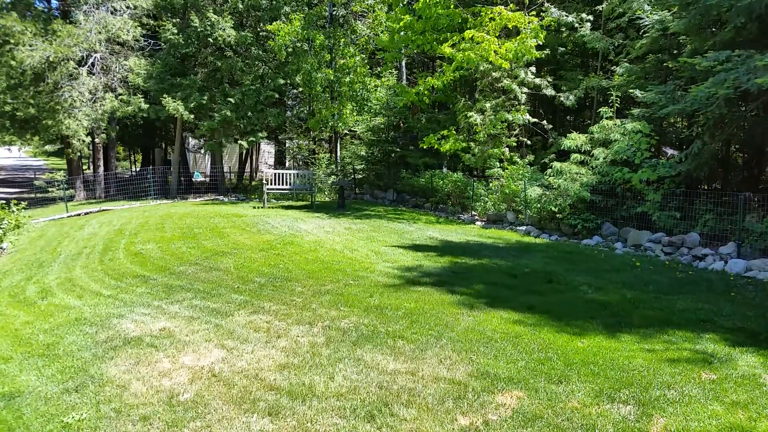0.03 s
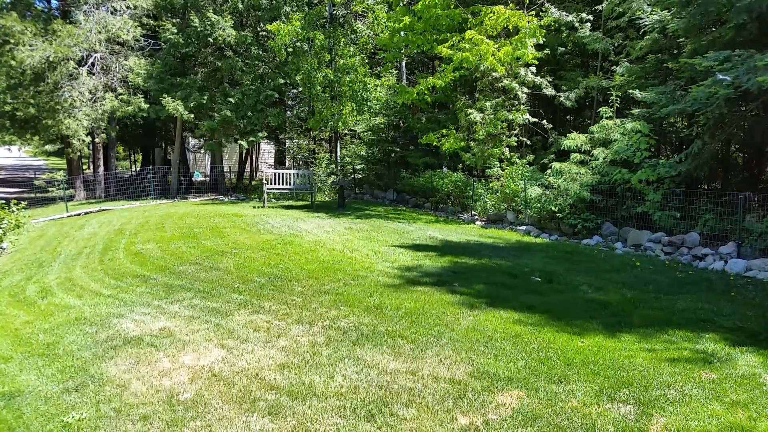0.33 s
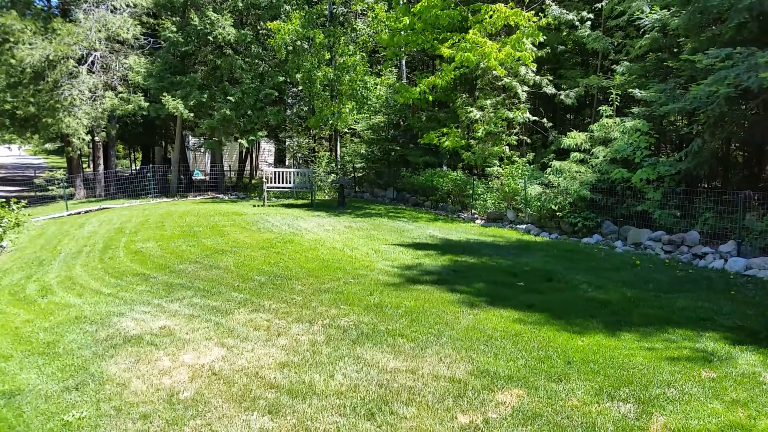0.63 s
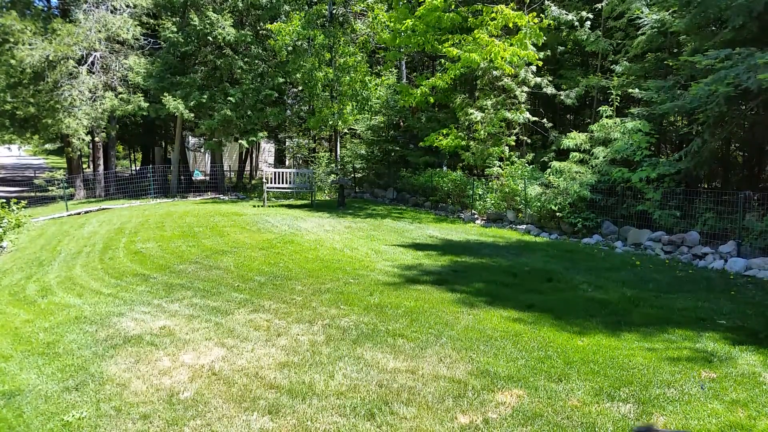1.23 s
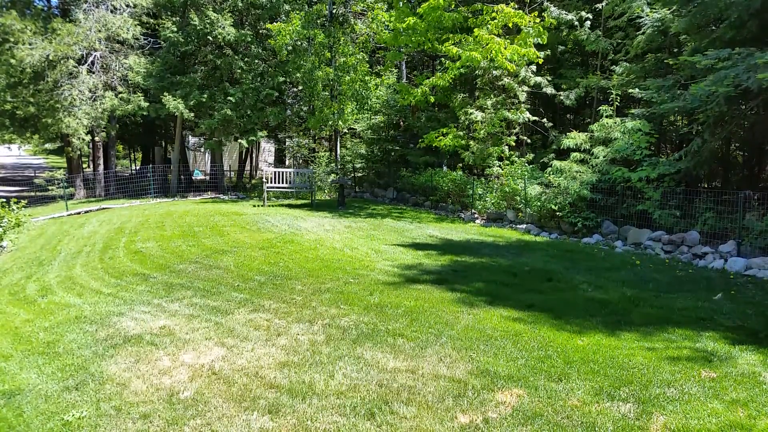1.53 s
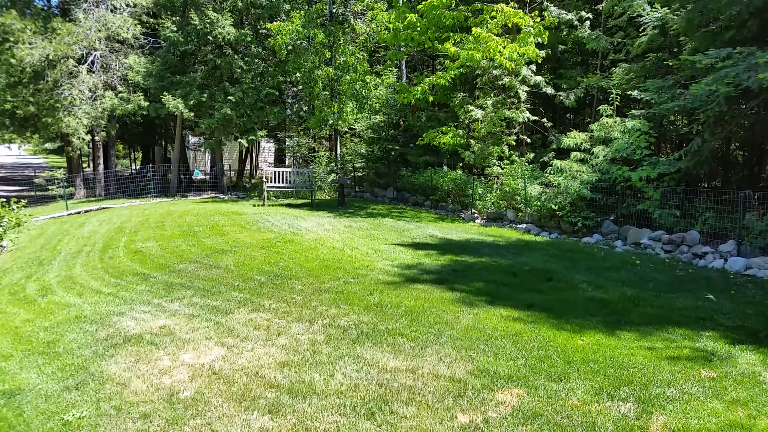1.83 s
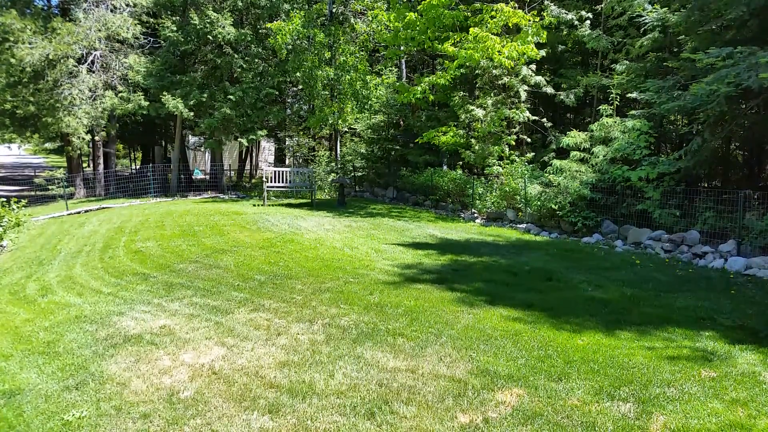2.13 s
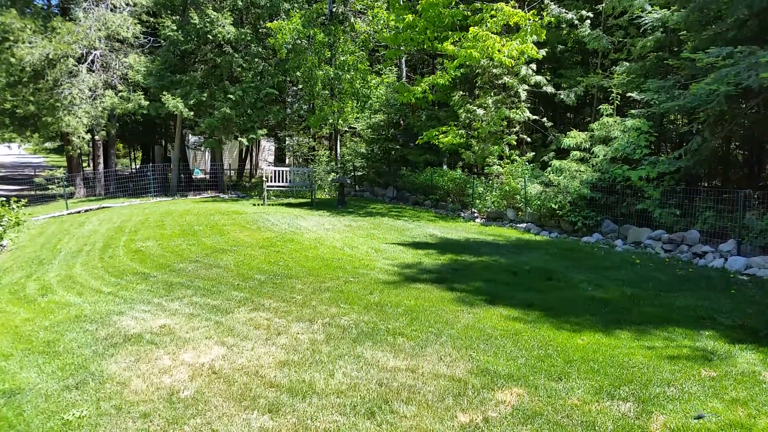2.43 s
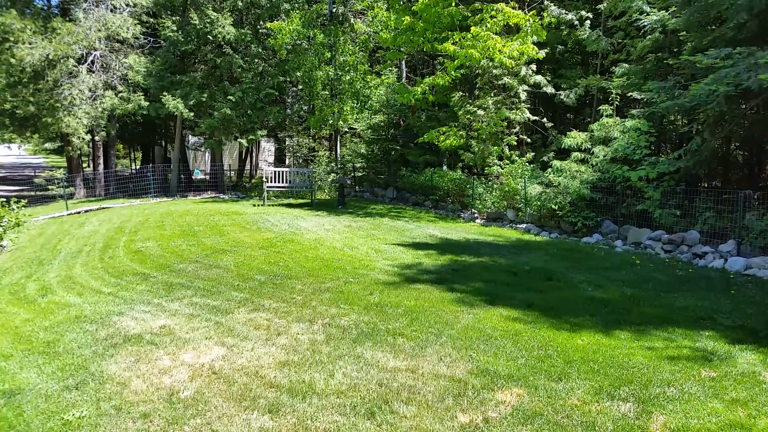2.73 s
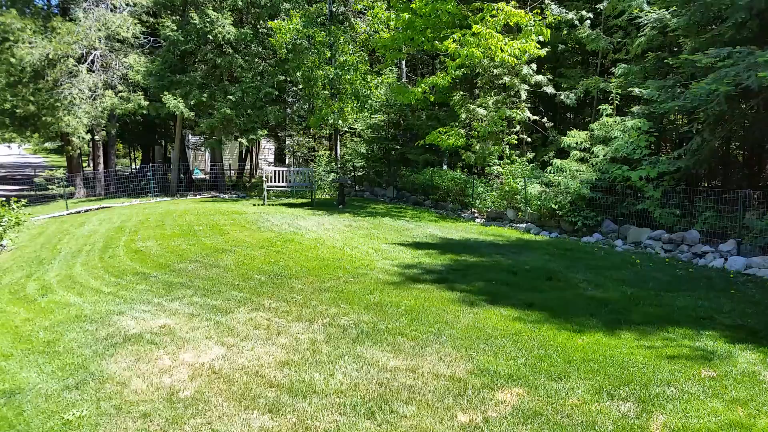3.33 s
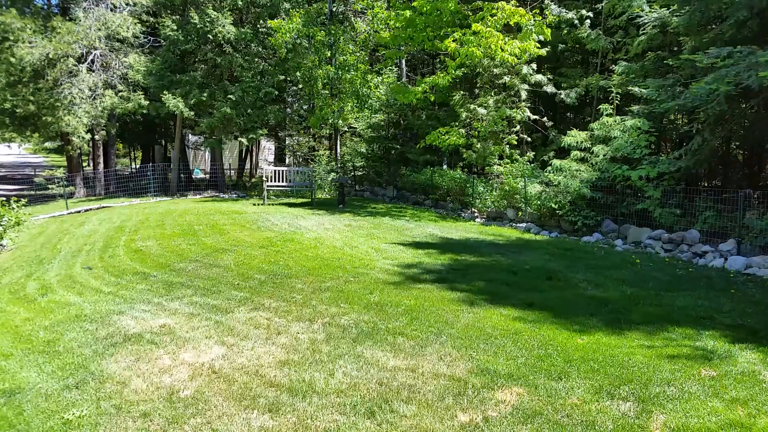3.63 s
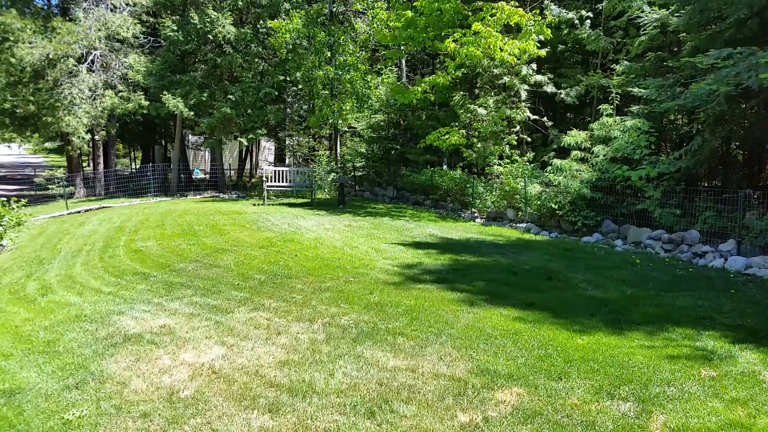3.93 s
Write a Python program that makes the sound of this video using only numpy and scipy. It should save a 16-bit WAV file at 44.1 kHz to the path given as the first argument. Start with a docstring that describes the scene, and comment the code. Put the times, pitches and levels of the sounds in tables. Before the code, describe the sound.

A light breeze puffs against the microphone with soft thumps, over gently rustling leaves.

```python
"""A light breeze buffets the right microphone port in puffs; its strongest eddies land as soft thumps.
Behind it lies a lawn edged by trees: leaves rustle and hiss over a far rumble, mostly from the left,
and slowly grow with the breeze. A few nearby leaves stir, a distant whine swells once,
and there is one tiny tick."""
import sys
import numpy as np
from scipy import signal
from scipy.fft import rfft, irfft, next_fast_len
from scipy.io import wavfile
from scipy.ndimage import uniform_filter1d, map_coordinates

SR = 44100
rng = np.random.default_rng(int(sys.argv[2]) if len(sys.argv) > 2 else 0)


def dump(signal):
    """Clip the signal to [-1, 1] and save it as 16-bit WAV at the path in sys.argv[1]."""
    limited = np.clip(np.atleast_2d(signal).T, -1, 1)
    pcm = np.round(limited * 32767).astype(np.int16)
    wavfile.write(sys.argv[1], SR, pcm)


N = 176400

# Fader ride of the breeze: (time [s], relative level [dB])
BREEZE_RIDE = [(0, -4), (.6, -5.5), (.85, -2), (1.15, -3), (1.6, -0.5), (2.3, -0.96), (2.8, -1),
               (3.15, 1.33), (3.6, 0.84), (4, 2)]
# Tone colour of each noise layer: (frequency [Hz], relative density [dB])
RUMBLE_EQ = [(10, -19), (25, -1.5), (50, -6.5), (75, 0), (100, -5), (150, -12.5), (300, -22.5),
             (600, -41.5), (1500, -84.5)]
LEAVES_EQ = [(80, -32.5), (200, 2), (330, -1), (650, -1.5), (900, -5.5), (1150, -8.5), (1450, -2),
             (1750, -1), (2250, -6), (2700, -11.5), (3500, -19), (4200, -27), (5000, -37.5), (7000, -46.5),
             (9000, -47), (16000, -74.5)]
HISS_EQ = [(5000, -73.5), (7300, -33.5), (8300, -20.5), (9000, -6.5), (9560, 1.5), (10300, -4.5),
           (11300, -8), (12100, -6), (12700, -9.5), (13500, -17), (14500, -17), (15700, -16.5)]
BUFFET_EQ = [(8, -35.5), (22, -16), (50, 0), (90, 0), (150, -9.5), (250, -28.5), (400, -41), (700, -70.5),
             (2000, -100)]
FLUTTER_EQ = [(60, -27.5), (130, 1), (200, -2), (300, -17), (420, -22.5), (700, -38), (1500, -58.5),
              (4000, -92)]
FLURRY_EQ = [(6000, -60), (8500, -20), (9600, 0), (11500, -2), (12400, -4), (13500, -15), (15700, -18)]
RASP_EQ = [(600, -38), (1100, -9), (1500, -2), (1850, 0), (2300, -7), (3500, -29), (6000, -62)]
# Puffs on the right port: (peak time [s], half length [s], level [dB])
PORT_PUFFS = [(0.07, 0.008, -49), (0.143, 0.0051, -38.5), (0.635, 0.02, -39), (0.721, 0.034, -36.5),
              (0.819, 0.0041, -31.5), (0.887, 0.011, -35.5), (0.957, 0.051, -41.5), (1.071, 0.013, -41.5),
              (1.196, 0.0071, -37), (1.268, 0.037, -37), (1.412, 0.023, -31), (1.533, 0.013, -27.5),
              (1.628, 0.019, -35), (1.711, 0.022, -41), (1.794, 0.021, -31), (1.88, 0.045, -47),
              (1.981, 0.016, -35), (2.113, 0.014, -35), (2.25, 0.015, -31.5), (2.306, 0.012, -34),
              (2.362, 0.013, -31), (2.482, 0.0095, -30.5), (2.567, 0.024, -26), (2.716, 0.0071, -40),
              (2.854, 0.039, -30.5), (2.897, 0.0083, -21), (2.984, 0.11, -35), (3.062, 0.018, -27),
              (3.106, 0.011, -25), (3.149, 0.018, -26), (3.213, 0.023, -25), (3.311, 0.032, -26.5),
              (3.413, 0.021, -25.5), (3.484, 0.007, -27.5), (3.583, 0.0082, -28.5), (3.678, 0.0089, -34.5),
              (3.853, 0.036, -28), (3.916, 0.014, -25.5), (3.977, 0.025, -24)]
# Single eddies: (time [s], peak [dB], width [ms], port [0 left, 1 right], sign [+1 push, -1 suction])
EDDIES = [(0.701, -23, 5.7, 1, -1), (1.435, -22.5, 4.8, 0, -1), (1.56, -20.5, 5.3, 1, 1),
          (1.787, -21, 5.5, 1, 1), (2.557, -21, 4.5, 1, -1), (2.893, -10.5, 5.04, 1, 1),
          (2.904, -17.5, 4.2, 1, 1), (3.203, -20.5, 3.9, 1, -1), (3.228, -20, 4.1, 1, -1),
          (3.276, -17, 5.5, 1, 1), (3.309, -16, 5.3, 1, 1), (3.338, -17, 5.8, 1, 1),
          (3.417, -11.5, 3.94, 1, 1), (3.473, -20.5, 4.9, 1, 1), (3.58, -22.5, 3.75, 1, 1),
          (3.834, -14.5, 3.9, 1, 1), (3.853, -15.5, 3.2, 1, 1), (3.868, -12, 3.45, 1, 1),
          (3.968, -23, 3.5, 1, 1), (3.993, -13, 4.54, 1, 1)]
# Partials of the distant whine: (frequency [Hz], level [dB])
WHINE_PARTIALS = [(1043, -64), (1714, -69), (1785, -63.5), (1942, -68), (2070, -66)]
# Shading of the garden's right side: (frequency [Hz], gain [dB])
RIGHT_SIDE_EQ = [(60, 3), (125, -3.5), (300, -1.5), (650, -6.5), (1100, -5.5), (1750, -15.5), (2500, -10),
                 (3500, -5.5), (5000, 1.5), (7000, 1), (8300, -10.5), (9560, -22.5), (11000, -11.5),
                 (12100, -12.5), (13500, -5), (15700, 0)]


def amp(db):
    """Decibels to gain."""
    return 10 ** (np.asarray(db) / 20)


def seconds():
    """The time of every sample."""
    return np.arange(N) / SR


def swell(peak_s, half_s):
    """A bell-shaped rise and fall."""
    return np.exp(-.5 * ((seconds() - peak_s) / half_s) ** 2)


def wobble(rate):
    """A smooth random curve, rate knots a second."""
    return map_coordinates(rng.standard_normal(int(N * rate / SR) + 4), [seconds() * rate])


def unit(x):
    """Scaled to rms 1."""
    return x / np.sqrt(np.mean(x ** 2) + 1e-20)


def filtered(x, response):
    """x through a gain that depends on frequency."""
    size = next_fast_len(N + SR // 2)
    return irfft(rfft(x, size) * response(np.fft.rfftfreq(size, 1 / SR)), size)[..., :N]


def equalised(x, eq):
    """x through an EQ curve drawn on a log frequency axis."""
    knots_hz, db = np.transpose(eq)
    return filtered(x, lambda hz: amp(np.interp(np.log(hz + 1), np.log(knots_hz + 1), db)))


def rush(eq, patchy_db):
    """Wide stereo noise of rms 1, with patches of random gain across time and frequency."""
    bins = signal.stft(rng.standard_normal((2, N)), nperseg=512)[2]
    patches = uniform_filter1d(rng.standard_normal(bins.shape[1:]), size=7, axis=0)
    patches = unit(uniform_filter1d(patches, size=16, axis=1))
    noise = signal.istft(bins * amp(patchy_db * patches), nperseg=512)[1][:, :N]
    return unit(equalised(noise, eq))


def levelled(noise, samples):
    """A leveller: irons out chance swells longer than its window."""
    power = uniform_filter1d(uniform_filter1d(noise ** 2, samples), samples)
    return noise / np.sqrt(np.abs(power) + .04)


def far_rumble(breeze_db):
    """A smooth low bed that rides the breeze."""
    return amp(-47 + 0.86 * breeze_db) * levelled(rush(RUMBLE_EQ, patchy_db=4.5), samples=3000)


def leaf_rustle(breeze_db):
    """The breeze moves the leaves: a softly wavering midrange."""
    return amp(-53.5 + 0.91 * breeze_db + 0.19 * wobble(7.7)) * rush(LEAVES_EQ, patchy_db=0.95)


def leaf_hiss(breeze_db):
    """The airy top of the leaves, growing a little faster than the breeze."""
    return amp(-63 + 1.12 * breeze_db + 0.27 * wobble(14)) * rush(HISS_EQ, patchy_db=0.9)


def buffeting(draught_db=-63.5, strong_puff_db=-24.5, flutter_db=-36):
    """Puffs over a faint draught stir low turbulence on the right port; strong ones add flutter."""
    churn = levelled(rush(BUFFET_EQ, patchy_db=-2.5)[1], samples=700)
    puff_power = sum((amp(db) * swell(peak_s, half_s)) ** 2 for peak_s, half_s, db in PORT_PUFFS)
    force = np.sqrt(amp(draught_db) ** 2 + puff_power)
    # The brighter flutter rises 2 dB per dB of force, reaching flutter_db in a strong puff.
    flutter_gain = amp(flutter_db) * (force / amp(strong_puff_db)) ** 2
    flutter = flutter_gain * rush(FLUTTER_EQ, patchy_db=2.5)[1]
    return np.array([np.zeros(N), force * churn + flutter])


def eddy_thumps(front_to_back=0.83):
    """An eddy crosses one port: a steep-fronted push or suction between two shallow counter-swings."""
    ports = np.zeros((2, N))
    for peak_s, db, width_ms, port, sign in EDDIES:
        u = (seconds() - peak_s) * 1000 / width_ms  # time in eddy widths
        u = np.where(u < 0, u / front_to_back, u)
        ports[port] += sign * amp(db) * (1 - 3 * u ** 2) / (1 + u ** 2) ** 3
    return ports


def leaf_flurry():
    """A few nearby leaves stir for a moment."""
    return amp(-65.5) * swell(peak_s=1.08, half_s=.025) * rush(FLURRY_EQ, patchy_db=2)


def distant_whine(wander_hz=10.5):
    """A few wavering partials and a rasp swell and fade far away."""
    tones = np.zeros((2, N))
    for hz, db in WHINE_PARTIALS:
        pitch_hz = hz + wander_hz * np.array([wobble(39.8), wobble(40.4)])
        tones += amp(db) * np.sqrt(2) * np.sin(2 * np.pi * np.cumsum(pitch_hz, axis=1) / SR)
    rasp = amp(-59) * rush(RASP_EQ, patchy_db=3.0)
    return swell(peak_s=1.365, half_s=0.11) * (tones + rasp)


def tick():
    """One tiny bright tick, in the colour of the hiss."""
    return amp(-52) * swell(peak_s=2.532, half_s=.003) * rush(HISS_EQ, patchy_db=-0.7)


def scene():
    """The garden leans left; the wind plays on the ports themselves."""
    breeze_db = np.interp(seconds(), *np.transpose(BREEZE_RIDE))
    bed = far_rumble(breeze_db) + leaf_rustle(breeze_db) + leaf_hiss(breeze_db)
    left, right = bed + distant_whine() + tick() + leaf_flurry()
    garden = np.array([left, equalised(right, RIGHT_SIDE_EQ)])
    return garden + buffeting() + eddy_thumps()


def record(dry):
    """A quick fade at both ends and a brick-wall high cut."""
    fade_s, high_cut_hz = .004, 15750
    edge = np.clip(np.minimum(seconds(), seconds()[::-1]) / fade_s, 0, 1)
    return filtered(dry * np.sin(np.pi / 2 * edge) ** 2, lambda hz: hz < high_cut_hz)


dry = scene()
out = record(dry)
dump(out)
```